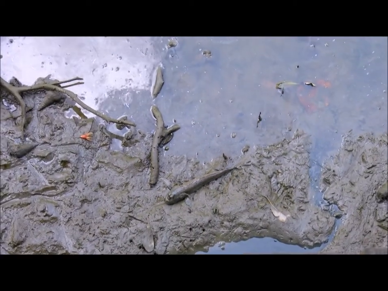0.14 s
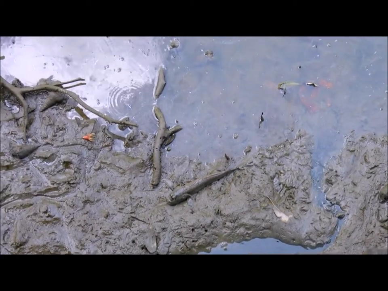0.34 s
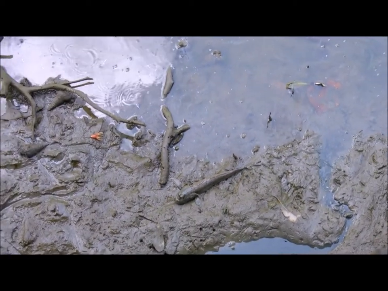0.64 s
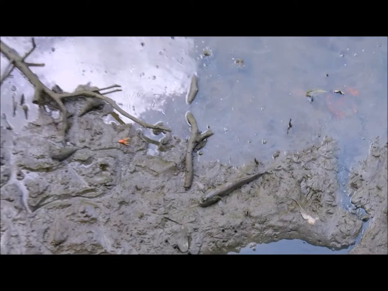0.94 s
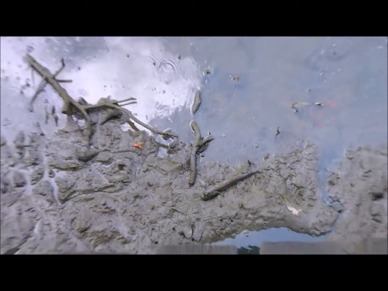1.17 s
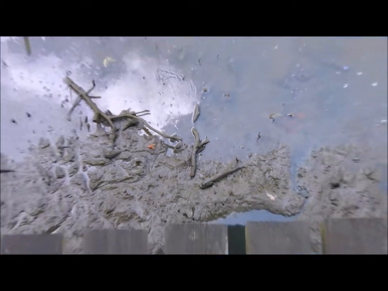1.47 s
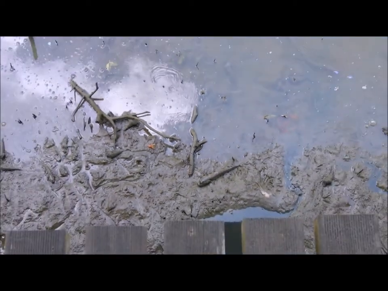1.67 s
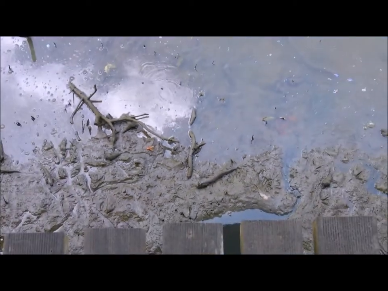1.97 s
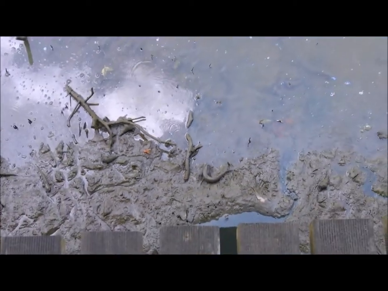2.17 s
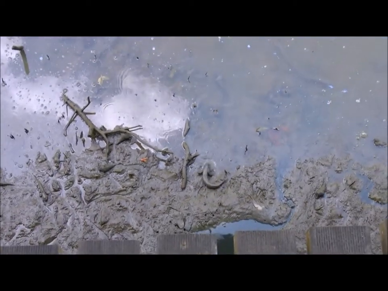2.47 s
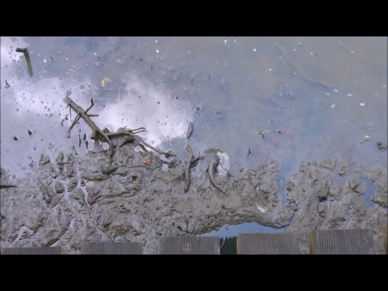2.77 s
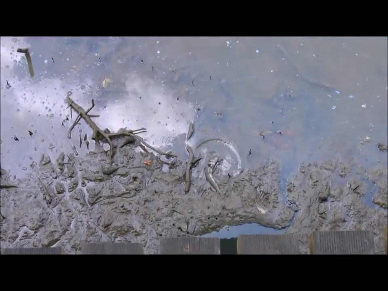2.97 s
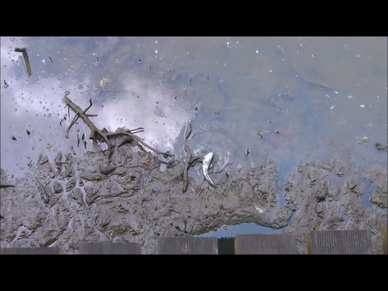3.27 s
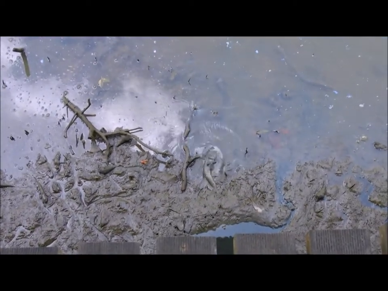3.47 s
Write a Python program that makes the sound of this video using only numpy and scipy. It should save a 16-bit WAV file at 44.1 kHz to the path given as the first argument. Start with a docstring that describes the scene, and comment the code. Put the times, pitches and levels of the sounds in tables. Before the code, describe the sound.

Cicadas shrilling in high, thin tones over soft hiss and far rumble, with close handling knocks.

```python
"""A muddy bank in summer, under a soft hiss and a far rumble. Cicadas shrill in the trees:
a near one sings falling phrases and fades while the chorus behind it swells.
Hollow knocks, clicks, bright snaps, soft scuffs and dull air bumps sound close to the microphones.
The singing mixes buzzing tones with noise in narrow bands; hiss and rumble are coloured noise;
knocks and snaps are ringing tones that die away, and scuffs are clusters of tiny blips."""
import sys
import numpy as np
from scipy.fft import rfft, irfft, next_fast_len
from scipy.io import wavfile
from scipy.ndimage import map_coordinates

SR = 44100
rng = np.random.default_rng(int(sys.argv[2]) if len(sys.argv) > 2 else 0)


def to_wav(s):
    """Save 16-bit WAV."""
    ch = np.atleast_2d(s).T  # columns
    pcm = np.round(np.clip(ch, -1, 1) * 32767)  # PCM
    wavfile.write(sys.argv[1], SR, pcm.astype(np.int16))


N = 159201  # length in samples

# left-right likeness of the surrounding sound: (frequency [Hz], likeness [-1 to 1])
FIELD_LIKENESS = [(50, 0.19), (300, 0.24), (700, 0.31), (1300, -0.015), (3100, 0.28), (6200, 0.5),
                  (9200, 0.19), (12300, -0.6)]
# how much stronger the left side is: (frequency [Hz], left minus right [dB])
FIELD_BALANCE = [(50, 5), (300, 3.5), (1000, 0), (3100, 1.5), (4500, 0), (6200, 2), (8000, 0.5),
                 (9300, 2.5), (12400, 1.2)]

# phrases of the near cicada: (start [s], length [s], starting pitch [Hz], relative level [dB])
PHRASES = [(-.03, 0.26, 3085, -41), (.26, 0.28, 3107, -42), (.61, 0.324, 3128, -43),
           (.98, 0.28, 3112, -43.5), (1.28, 0.35, 3111, -41.5), (1.62, 0.267, 3110, -45.5),
           (1.9, .3, 3108, -53), (2.45, .33, 3127, -55.5)]
# strength of its first to fourth harmonic: (relative level [dB])
HARMONIC_LEVELS = [-6, -1.5, -8, 2.5]
CICADA_DB = 1
SAG_HZ_PER_S, FADE_S = 115, .04
BUZZ_HZ, BUZZ_DEPTH = 369, .31
BUZZ_SWING_RAD = .08  # swing in phase of the first harmonic
JITTER_HZ, SCATTER, SWELL_DB = 3, .25, 2.2  # sizes of the random wobbles

# ringing bands of its echo in the trees: (centre [Hz], relative width [Hz], relative level [dB])
ECHO_BANDS = [(3110, 79, -58), (5830, 110, -60), (6180, 62, -48.5), (6410, 340, -54.5), (9260, 95, -53),
              (12020, 260, -56), (12450, 230, -46)]
# rise and fall of the echo: (time [s], relative level [dB])
ECHO_LEVEL = [(0, 1.5), (.7, -0.5), (1.5, -2.5), (1.7, 1.5), (1.92, 1.5), (2.1, -5), (2.4, -8), (3.6, -16)]
# ringing bands of the chorus: (centre [Hz], relative width [Hz], relative level [dB])
CHORUS_BANDS = [(2157, 24, -60.5), (3101, 172, -46), (6240, 130, -61.5), (9290, 340, -54),
                (12420, 190, -40.5)]
# swelling of the chorus: (time [s], relative level [dB])
CHORUS_LEVEL = [(0, -9.5), (1.45, -4.5), (1.7, -5), (2.1, 2), (2.7, 1.5), (3.6, 0.5)]
# bands of the far insects: (centre [Hz], relative width [Hz], relative level [dB])
FAR_BANDS = [(2920, 130, -65.5), (3415, 420, -56.5), (6100, 200, -71), (7280, 350, -55), (7710, 220, -57),
             (8300, 120, -68), (9100, 1000, -57), (12100, 380, -49), (12700, 300, -61.5)]

# colour of the background hiss and rumble: (frequency [Hz], relative level per Hz [dB])
AIR_COLOUR = [(20, -13), (45, -4.5), (90, 2), (140, 0.5), (250, -0.5), (400, -1), (700, -2.5), (1000, -8),
              (1500, -11), (2300, -14.5), (4000, -17), (6000, -17.5), (8500, -20.5), (10600, -17.5),
              (11400, -24), (12800, -26), (13300, -45), (16000, -60)]
# rise and fall of the rumble: (time [s], relative level [dB])
RUMBLE_LEVEL = [(0, 3.5), (.3, 0), (.9, 0.5), (1.45, 1), (1.65, 1), (2.05, 1.5), (2.35, 2), (2.6, -0.5),
                (3.1, 1), (3.6, 2)]
AIR_DB = -40

# air bumps: (centre [s], half length [s], relative level [dB], left minus right [dB])
BUMPS = [(0.01, .015, -32, 4), (0.05, 0.019, -29.5, 2), (0.737, 0.016, -34, 4.5)]
# colour of the bumps: (frequency [Hz], relative level [dB])
BUMP_COLOUR = [(20, -12), (45, -3), (90, 0), (200, -5), (400, -25), (1000, -50), (3000, -90)]
BUMP_LIKENESS = -.63  # left-right likeness: the sides mostly oppose each other

# knocks: (start [s], relative ring level [dB], ring pitch [Hz], relative click level [dB],
# left minus right [dB])
KNOCKS = [(.150, -24.5, 500, -37, 11), (.156, -23, 750, -46, 2), (.7395, -27, 560, -44, 7),
          (1.3437, -39, 984, -21, -0.5), (1.3791, -25.5, 1040, -31, -3), (1.434, -16.5, 960, -34, -5),
          (1.441, -15.5, 1120, -25, -5), (1.4435, -20, 720, -40, -1), (2.397, -17, 1300, -14, -1),
          (2.3988, -17, 1090, -14, 3.5), (2.402, -17.5, 850, -23, -4), (2.408, -30, 900, -19, -8),
          (2.4133, -11, 1060, -17, -2), (2.418, -18.5, 760, -23, 4), (2.8713, -20.5, 880, -24.5, 2),
          (2.875, -21.5, 890, -26.5, -5), (2.947, -30, 1120, -44, 0), (2.979, -20.5, 814, -41, -1),
          (3.122, -22, 786, -45, 5), (3.127, -14.5, 700, -38, 6.5), (3.137, -15.5, 840, -33, -2),
          (3.144, -22.5, 720, -44, 0), (3.153, -24, 830, -30, 5), (3.2433, -20.5, 960, -21, -1),
          (3.2475, -15.5, 780, -48, 2), (3.269, -23, 940, -46, -1), (3.295, -33, 680, -54, 5),
          (3.299, -26, 754, -48, 2), (3.334, -27.5, 815, -41, 5), (3.3795, -27, 690, -50, 7),
          (3.4976, -20, 715, -49, 8), (3.502, -20, 710, -48, -3)]
# tones in one knock: (ratio to the ring pitch, relative level [dB], time to fall 60 dB [s])
KNOCK_MODES = [(.3, -27, .035), (.55, -16, .022), (.78, -8, 0.017), (0.998, 4.5, 0.015), (1.25, -7, 0.011),
               (2.1, -23, 0.0068)]
# colour of the clicks: (frequency [Hz], relative level [dB])
CLICK_COLOUR = [(200, -3), (900, 1), (2200, -1.5), (3200, 1), (4500, -0.5), (8000, -3), (12000, -3.5),
                (15500, -8)]
KNOCK_ATTACK_S, PORT_LAG_S, KNOCK_LOW_HZ = .001, .00019, 330
CLICK_T60_S, TAIL_DB, TAIL_T60_S = .0096, -13.5, .067  # T60: time to fall 60 dB

# grainy scuffs: (centre [s], half length [s], relative level [dB], middle pitch [Hz])
RUBS = [(0.168, 0.014, -38.5, 744), (0.262, 0.063, -42.5, 1100), (.53, 0.022, -44, 710),
        (0.722, 0.0091, -36, 550), (.745, 0.013, -36, 620), (1.077, .022, -38.5, 597),
        (1.526, 0.0088, -41, 1195), (1.564, 0.017, -39, 320), (1.728, 0.048, -41.5, 356.5),
        (2.228, 0.022, -38, 430), (2.285, 0.027, -39, 650), (2.378, 0.02, -31.5, 820),
        (2.416, 0.03, -35, 700), (2.476, 0.042, -42.5, 501), (2.865, 0.014, -36, 850),
        (2.92, .035, -42, 290), (2.946, 0.021, -43, 900), (3.141, 0.017, -41, 720), (3.18, 0.013, -41, 710),
        (3.263, .02, -42, 815), (3.302, .008, -33, 720), (3.378, .014, -37, 640), (3.504, 0.011, -39, 550)]
# colour of the hiss under them: (frequency [Hz], relative level [dB])
RUB_COLOUR = [(60, -22), (200, -11), (500, -5), (1000, 7), (2000, -4), (3500, -7), (8000, -14),
              (14000, -26)]
GRAINS_PER_S, GRAIN_CYCLES = 700, 8.7  # density; cycles for a blip to fall 60 dB
GRAIN_SPREAD, RUB_HISS_DB = .3, -6  # scatter of log pitch; hiss under the blips

# hard snaps: (start [s], relative level [dB], pitch [Hz])
SNAPS = [(1.3436, -18, 3650), (1.4415, -25, 3600), (2.3976, -16, 1950), (2.399, -19, 3100),
         (2.4132, -25, 2050), (3.2438, -22, 3900)]
# tones in one snap: (ratio to the pitch, relative level [dB], time to fall 60 dB [s])
SNAP_MODES = [(1, 0, .014), (1.08, -3, .011), (1.25, -3, .009), (1.7, -9, .007)]

# treble colour of the microphones: (frequency [Hz], gain [dB])
MIC_COLOUR = [(12800, 0), (13050, 3.5), (13400, -6), (15800, -13)]
TOP_HZ = 15800


def amp(db):
    """Decibels to gain."""
    return 10 ** (np.asarray(db) / 20)


def unit(x):
    """Scale to an rms (average strength) of 1."""
    return x / np.sqrt(np.mean(x ** 2) + 1e-20)


def along(points, hz):
    """Read (frequency, value) points along a log frequency axis."""
    f, v = np.transpose(points)
    return np.interp(np.log(hz + 1), np.log(f + 1), v)


def curve(rows):
    """Join (time, value) points into one value per sample."""
    return np.interp(np.arange(N) / SR, *np.transpose(rows))


def wobble(rate):
    """A smooth random curve with this many random knots a second."""
    knots = rng.standard_normal(int(N * rate / SR) + 4)
    return map_coordinates(knots, [np.arange(N) * rate / SR])


def filtered(x, response):
    """Multiply the spectrum of x by a function of frequency."""
    m = next_fast_len(N + SR // 2)
    return irfft(rfft(x, m) * response(np.fft.rfftfreq(m, 1 / SR)), m)[..., :N]


def spread(pair):
    """Mix two signals into left and right with the likeness and balance of the surrounding field."""
    def shares(hz):
        turn = np.arccos(np.clip(along(FIELD_LIKENESS, hz), -1, 1)) / 2
        return np.array([np.cos(turn), np.sin(turn)])

    mid, side = filtered(pair, shares)
    stereo = np.array([mid + side, mid - side])
    return filtered(stereo, lambda hz: amp(np.outer([.5, -.5], along(FIELD_BALANCE, hz))))


def rush(colour):
    """Stereo noise of rms 1 with the given colour."""
    noise = rng.standard_normal((2, N))
    return unit(spread(filtered(noise, lambda hz: amp(along(colour, hz)))))


def near_cicada():
    """Each phrase sags in pitch; the tymbal buzz adds side lines and leaves scatter each overtone."""
    t = np.arange(N) / SR
    pitch, level = np.full(N, float(PHRASES[0][2])), np.zeros(N)
    for start, length, hz, db in PHRASES:
        pitch = np.where(t >= start, hz - SAG_HZ_PER_S * (t - start), pitch)
        nearest_end = np.minimum(t - start, start + length - t)
        level = level + amp(db) * np.clip(nearest_end / FADE_S, 0, 1)
    beat = 2 * np.pi * np.cumsum(BUZZ_HZ + 15 * wobble(40)) / SR
    phase = 2 * np.pi * np.cumsum(pitch + JITTER_HZ * wobble(150)) / SR
    phase = phase - BUZZ_SWING_RAD * np.sin(beat)
    buzz = 1 + BUZZ_DEPTH * np.cos(beat)
    pair = np.zeros((2, N))
    for k, db in enumerate(HARMONIC_LEVELS, 1):
        gain = amp(db) * amp(SWELL_DB * wobble(11))
        for i, direct in enumerate((1, 1j)):  # the two signals start a quarter cycle apart
            paths = direct + SCATTER * (wobble(29.96) + 1j * wobble(29.66))
            pair[i] += gain * np.real(paths * np.exp(1j * k * phase))
    return amp(CICADA_DB) * spread(pair * buzz * level)


def shrill(bands, flutter_db):
    """Many tymbal clicks blur into noise that rings in narrow bands."""
    def response(hz):
        power = 0
        for centre, width, db in bands:
            w = .61 * width
            power = power + amp(db) ** 2 * SR / (np.pi * w) / (1 + ((hz - centre) / w) ** 2) ** 2
        return np.sqrt(power)

    noise = rng.standard_normal((2, N))
    return spread(filtered(noise, response)) * amp(flutter_db * wobble(12))


def insects():
    """The near cicada's echo, the swelling chorus and the nearly steady far singers, as band noise."""
    echo = shrill(ECHO_BANDS, flutter_db=-.5) * amp(curve(ECHO_LEVEL))
    chorus = shrill(CHORUS_BANDS, flutter_db=1.4) * amp(curve(CHORUS_LEVEL))
    return echo + chorus + shrill(FAR_BANDS, flutter_db=-.2)


def air():
    """A smooth hiss over a far rumble, whose deep and middle parts drift on their own."""
    noise = amp(AIR_DB) * rush(AIR_COLOUR)
    low = filtered(noise, lambda hz: 1 / (1 + (hz / 900) ** 4))
    deep = filtered(low, lambda hz: 1 / (1 + (hz / 260) ** 4))
    rumble = deep * amp(.91 * wobble(14)) + (low - deep) * amp(.96 * wobble(14))
    return noise - low + rumble * amp(curve(RUMBLE_LEVEL))


def bumps():
    """Puffs of air push unequally on the two microphone ports: short swells of low noise."""
    t = np.arange(N) / SR
    level = np.zeros((2, N))
    for centre, half, db, pan_db in BUMPS:
        sides = amp(db + pan_db * np.array([[.5], [-.5]]))
        level += sides * np.exp(-((t - centre) / half) ** 2)
    turn = np.arccos(np.clip(BUMP_LIKENESS, -1, 1)) / 2
    noise = rng.standard_normal((2, N))
    shared, opposed = unit(filtered(noise, lambda hz: amp(along(BUMP_COLOUR, hz))))
    return level * (np.cos(turn) * shared + np.array([[1], [-1]]) * np.sin(turn) * opposed)


def knocks():
    """Each contact is a sharp click and a hollow ring of a few cycles, reaching the right port first."""
    t = np.arange(SR // 8) / SR
    rings, clicks = np.zeros((2, N + SR)), np.zeros((2, N + SR))
    late = np.maximum(t - np.array([[PORT_LAG_S], [0]]), 0)  # time since arrival, left and right
    for s, ring_db, hz, click_db, pan_db in KNOCKS:
        sides, start = amp(np.array([[.5], [-.5]]) * pan_db), round(s * SR)
        ring = np.zeros((2, len(t)))
        for ratio, db, t60 in KNOCK_MODES:
            uneven_db = db + rng.normal(0, .98, (2, 1))
            ring += amp(uneven_db - 60 * late / t60) * np.sin(2 * np.pi * hz * ratio * late)
        ring *= 1 - np.exp(-late / KNOCK_ATTACK_S)
        burst = amp(-60 * late / CLICK_T60_S) + amp(TAIL_DB - 60 * late / TAIL_T60_S)
        burst *= 1 - np.exp(-late / .000067)
        click = burst * rng.standard_normal((2, len(t)))
        rings[:, start:start + len(t)] += sides * amp(ring_db + 2.5) * ring
        clicks[:, start:start + len(t)] += sides * amp(click_db + 4.5) * click

    def thin(hz):  # weakens the ring below KNOCK_LOW_HZ
        ratio = KNOCK_LOW_HZ / (hz + 1)
        return 1 / (1 - 1.4j * ratio - ratio ** 2)

    return filtered(rings[:, :N], thin) + filtered(clicks[:, :N], lambda hz: amp(along(CLICK_COLOUR, hz)))


def rubs():
    """Each scuff is a cluster of tiny damped blips around one pitch, over a little hiss."""
    t, life = np.arange(N) / SR, np.arange(SR // 40) / SR
    grains, level = np.zeros((2, N)), np.zeros(N)
    size = 128  # blips in a scuff
    for centre, half, db, hz in RUBS:
        pitch = hz * np.exp(GRAIN_SPREAD * rng.standard_normal((size, 1)))
        start = centre + (np.arange(size) - size / 2 + rng.random(size)) / GRAINS_PER_S
        gain = amp(4.2 * rng.standard_normal(size)) * np.exp(-((start - centre) / half) ** 2)
        decay = amp(-60 * life * pitch / GRAIN_CYCLES)
        blips = gain[:, None] * decay * np.sin(2 * np.pi * pitch * life)
        at = (start * SR).astype(int)[:, None] + np.arange(len(life))
        at = np.clip(at, 0, N - 1).ravel()
        pair = []
        for _ in range(2):  # random signs make the two signals differ
            signed = blips * rng.choice([-1, 1], (size, 1))
            pair.append(np.bincount(at, signed.ravel(), N))
        grains += amp(db) * unit(np.array(pair)) * np.sqrt(half * SR / N)
        level += amp(db) * np.exp(-((t - centre) / half) ** 2)
    return np.sqrt(2) * spread(grains) + amp(RUB_HISS_DB) * level * rush(RUB_COLOUR)


def snaps():
    """Small hard contacts ring for a few milliseconds, with their own phase at each port."""
    t = np.arange(SR // 20) / SR
    out = np.zeros((2, N + SR))
    for s, db, hz in SNAPS:
        ring = np.zeros((2, len(t)))
        for ratio, mode_db, t60 in SNAP_MODES:
            cycles = hz * ratio * t + rng.random((2, 1))
            ring += amp(mode_db - 60 * t / t60) * np.sin(2 * np.pi * cycles)
        start = round(s * SR)
        out[:, start:start + len(t)] += amp(db) * ring * (1 - np.exp(-t / .0004))
    return out[:, :N]


def scene():
    """Insects and air all around; bumps, knocks, scuffs and snaps up close."""
    return near_cicada() + insects() + air() + bumps() + knocks() + rubs() + snaps()


def record(dry):
    """The microphones lift a sliver near 13 kHz, dull the treble above it and cut off at TOP_HZ."""
    return filtered(dry, lambda hz: amp(along(MIC_COLOUR, hz)) * (hz < TOP_HZ))


dry = scene()
out = record(dry)
to_wav(out)
```